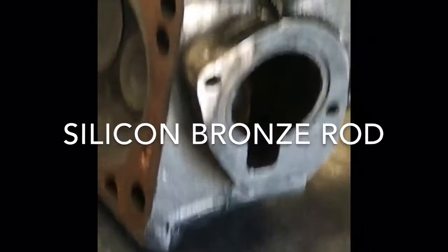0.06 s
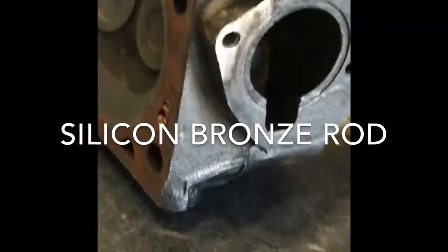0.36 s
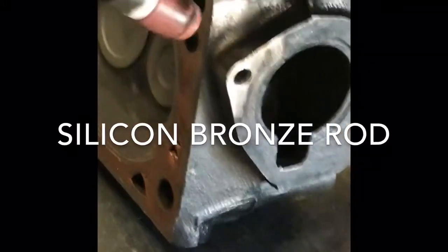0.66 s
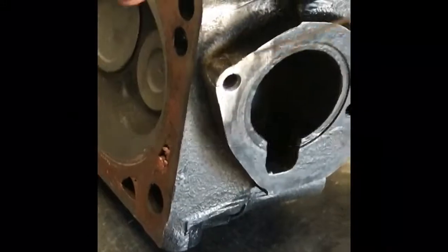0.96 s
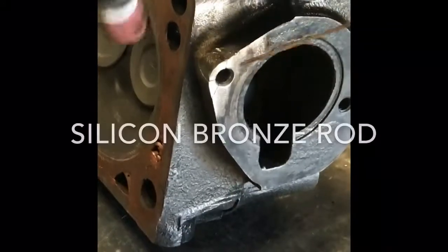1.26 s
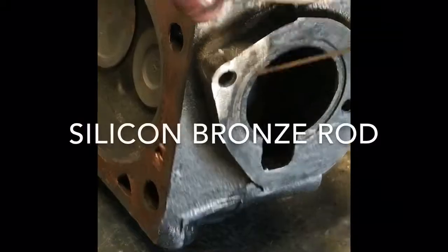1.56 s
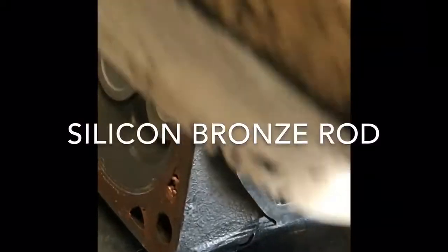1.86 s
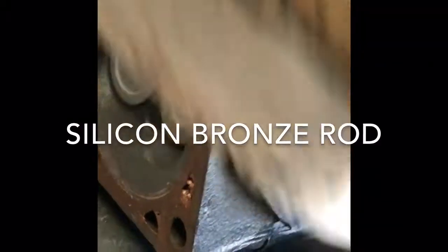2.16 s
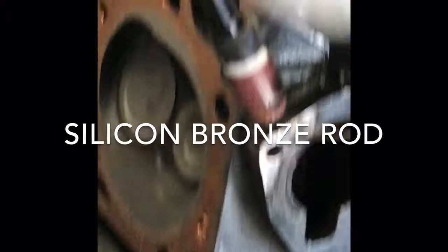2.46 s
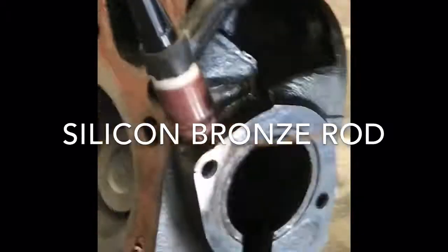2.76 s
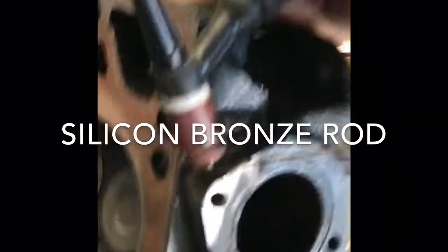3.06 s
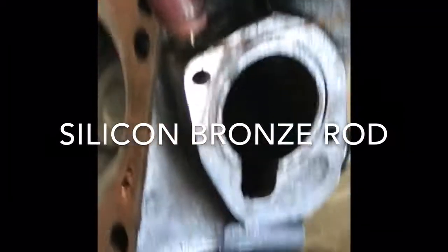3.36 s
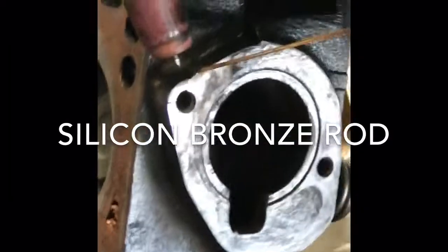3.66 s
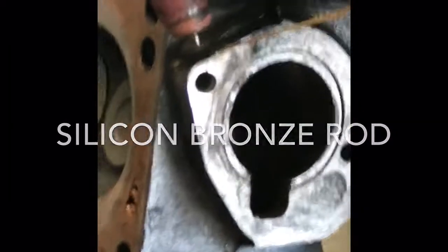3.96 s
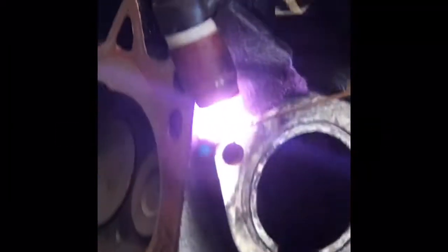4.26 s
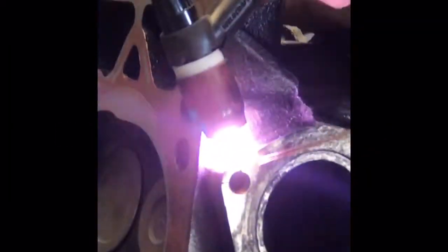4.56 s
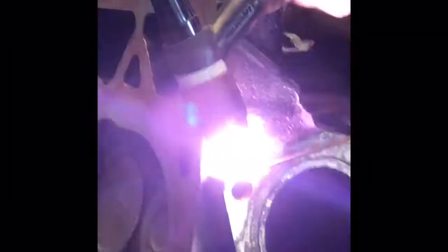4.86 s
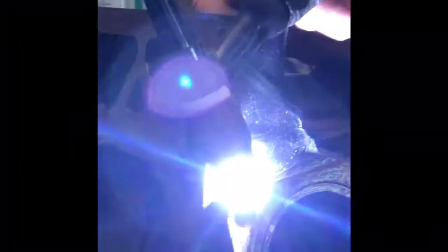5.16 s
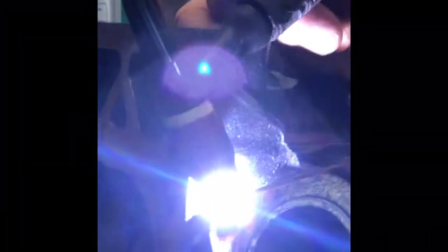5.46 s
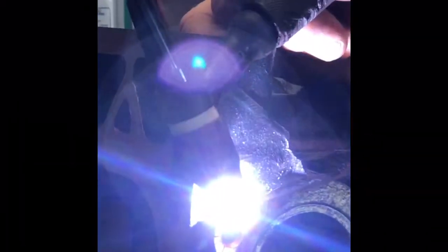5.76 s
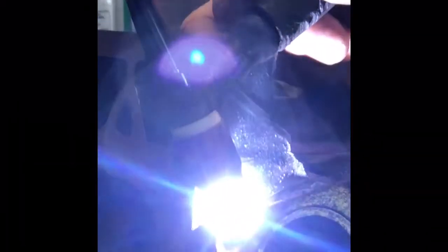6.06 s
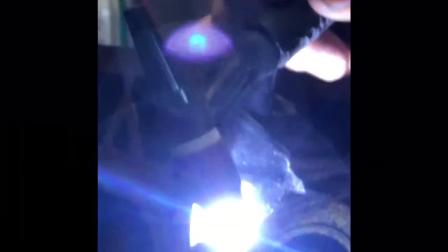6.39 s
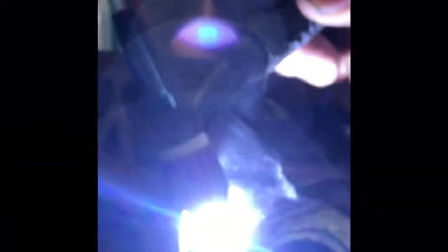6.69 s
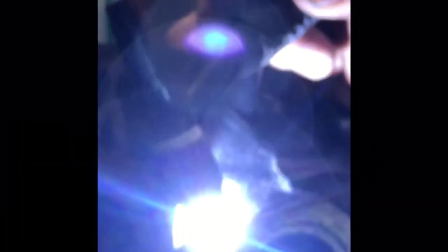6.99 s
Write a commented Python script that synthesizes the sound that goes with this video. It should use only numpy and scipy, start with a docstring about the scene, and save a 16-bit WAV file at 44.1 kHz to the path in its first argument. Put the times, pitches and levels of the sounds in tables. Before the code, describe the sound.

A welder's fan drones, a valve clicks and gas hisses, then an electric arc crackles loudly and settles into a steady buzz.

```python
"""Workshop: TIG welding on a cast engine part, close to a phone. The welder's fan drones; trigger and
gas valve click and argon surges from the cup. The AC arc first sputters, hissing at every half cycle
and popping as it relights, goes out, strikes again and settles to a fine buzz. Hollows in the casting
colour arc and gas. The phone's gain control ducks the workshop under the sputtering."""
import sys
import numpy as np
from scipy import signal
from scipy.fft import rfft, irfft, next_fast_len
from scipy.io import wavfile
from scipy.ndimage import uniform_filter1d, minimum_filter1d, map_coordinates

SR = 44100
rng = np.random.default_rng(int(sys.argv[2]) if len(sys.argv) > 2 else 0)


def digitize_waveform(pressure):
    """Quantize a signal to 16-bit integers and store it at the path in sys.argv[1].

    Rows of a 2-D input are taken as channels; values are limited to [-1, 1].
    """
    field = np.atleast_2d(pressure).T
    bounded = np.clip(field, -1, 1)
    quanta = np.round(bounded * 32767).astype(np.int16)
    wavfile.write(sys.argv[1], SR, quanta)


N = 314462
T = np.arange(N) / SR
FFT_SIZE = next_fast_len(N + 8192, True)
F = np.maximum(np.arange(FFT_SIZE // 2 + 1) * SR / FFT_SIZE, 1e-3)

HALF_CYCLE_HZ, REIGNITE_PHASE = 120.0, .6  # phase in half cycles
LIGHT_S, LIGHT_RISE_S, CALM_S = 4.148, .006, 4.7  # first arc
STRIKE_S, STEP_UP_S = 5.15, 5.335  # second arc

# Hollows of the casting. Each row: frequency in Hz, width in Hz, gain in dB.
CASTING_MODES = [(2570, 710, -9.5), (3965, 820, 3), (5310, 210, -9.5), (6030, 420, 1.5), (6980, 470, 1.5),
                 (8250, 290, -4), (9820, 490, -2), (12080, 1300, -1.5)]


def undb(db):
    """Decibels to gain."""
    return 10 ** (np.asarray(db) / 20)


def unit(x):
    """Scale to rms 1."""
    return x / np.sqrt(np.mean(x ** 2))


def noise():
    """White noise."""
    return rng.standard_normal(N)


def walk(rate_hz):
    """Random wander, spread near 1."""
    return np.interp(T * rate_hz, np.arange(1024), rng.standard_normal(1024))


def ramp(start_s, length_s):
    """Linear rise from 0 to 1, then held."""
    return np.clip((T - start_s) / length_s, 0, 1)


def fade(start_s, decay_s):
    """Jump to 1, then exponential decay."""
    envelope = np.zeros(N)
    first = int(start_s * SR)
    age_s = T[:min(int(10 * decay_s * SR), N - first)]
    envelope[first:first + len(age_s)] = np.exp(-age_s / decay_s)
    return envelope


def delayed(x, delay_ms):
    """Fixed or moving delay."""
    return map_coordinates(x, [(T - delay_ms / 1000) * SR], order=3)


def through(x, response):
    """Filter by a frequency response."""
    return irfft(rfft(x, FFT_SIZE) * response, FFT_SIZE)[:N]


def colour(points):
    """Minimum-phase response through (Hz, dB) points."""
    hz, db = np.transpose(points)
    outline_db = np.interp(np.log(F), np.log(hz), db)
    cepstrum = irfft(np.log(undb(outline_db)), FFT_SIZE)
    cepstrum[1:FFT_SIZE // 2] *= 2
    cepstrum[FFT_SIZE // 2 + 1:] = 0
    return np.exp(rfft(cepstrum))


def lowpass(hz):
    """One-pole low-pass response."""
    return 1 / (1 + 1j * F / hz)


def band(hz, width_hz):
    """One resonance, gain 1 at its centre."""
    return 1 / (1 + 1j * (F - hz * hz / F) / width_hz)


def modes(rows):
    """Sum of (Hz, width in Hz, dB) resonances."""
    return sum(undb(db) * band(hz, width_hz) for hz, width_hz, db in rows)


def fan(air_db=-38.5, rumble_hz=330, thin_s=5.23, thinning_s=.41, thin_db=-5.5):
    """Rushing air and wavering lines of fan and transformer; the rumble thins during the weld."""
    # Fan and room noise. Each row: frequency in Hz, relative density in dB.
    air_spectrum = [(25, -9), (45, -13.5), (60, -12.5), (92, -13), (129, -4), (161, -3), (240, -9),
                    (312, -9.5), (360, -13.5), (525, -12), (753, -21), (1020, -19), (1460, -24),
                    (2000, -28.5), (6000, -38), (16000, -55.5)]
    # Drone lines. Each row: frequency in Hz, mean level in dB.
    drone_lines = [(73.3, -53.5), (112, -53), (118, -48), (138.6, -42.5), (183, -50), (192, -55)]
    air = unit(through(noise(), colour(air_spectrum))) * undb(air_db + .5 * walk(4.61))
    rumble = through(air, 1 / (1 + (F / rumble_hz) ** 4))
    drone = 0
    for hz, db in drone_lines:
        phase = 2 * np.pi * np.cumsum(hz + 1.71 * walk(9)) / SR
        drone += np.sqrt(2) * undb(db + 3.7 * walk(5.3)) * np.sin(phase)
    rumble_gain = undb(thin_db * ramp(thin_s, thinning_s))
    return air + (rumble_gain - 1) * rumble + drone


def tool_clicks():
    """Trigger, hood and rod click: short bursts of band noise."""
    # Clicks. Each row: start in seconds, level in dB, centre in Hz, width in Hz, decay in seconds.
    clicks = [(.089, -45, 10000, 12000, .005), (.099, -34.5, 1830, 2500, 0.0099),
              (.14, -44, 11000, 9000, .008), (0.251, -27.5, 1490, 2200, 0.012),
              (2.489, -31.5, 6000, 12100, 0.0028), (2.499, -34.5, 1300, 1500, 0.0062),
              (2.608, -34.5, 12800, 9000, .0079), (2.644, -43, 6550, 9000, 0.039),
              (2.736, -40.5, 2630, 397, .017), (3.14, -48, 9000, 7000, .02),
              (3.323, -33.5, 1640, 900, .004)]
    return sum(undb(db) * fade(start_s, decay_s) * unit(through(noise(), band(hz, width_hz) ** 2))
               for start_s, db, hz, width_hz, decay_s in clicks)


def gas_valve():
    """The valve clacks and bounces; each blow rings its modes."""
    # Blows. Each row: time in seconds, impulse height in dB.
    clacks = [(0.2702, 14.5), (0.2717, 16.5), (.278, 16)]
    # Valve resonances. Each row: frequency in Hz, width in Hz, gain in dB.
    valve_modes = [(325, 37, 13), (890, 210, -4), (1330, 130, -5), (2300, 150, -8), (3370, 530, -30)]
    blows = np.zeros(N)
    for time_s, db in clacks:
        blows[int(time_s * SR)] += undb(db)
    return through(blows, modes(valve_modes))


def gas_flow_db(open_s=.139, rise_s=.1, hold_s=.31, surge_db=-30, drain_db_per_s=26.5,
                steady_db=-56, on_work_db=7.3, soften_db_per_s=3):
    """Stored pressure drains to a steady flow, louder as the cup nears the work, softer in the weld."""
    surge = undb(surge_db - drain_db_per_s * np.maximum(T - open_s - hold_s, 0))
    lowered = ramp(start_s=2.1, length_s=1.5)
    steady = undb(steady_db + on_work_db * lowered - soften_db_per_s * np.maximum(T - STEP_UP_S, 0))
    return 20 * np.log10(np.hypot(surge, steady) * ramp(open_s, rise_s) + 1e-9)


def breathy(hz, width_hz):
    """A whistle kept wide and unsteady by turbulence."""
    swirl = unit(through(noise(), lowpass(width_hz) ** 2))
    phase = 2 * np.pi * np.cumsum(hz + .5 * width_hz * walk(140)) / SR
    return unit(swirl * np.sin(phase))


def gas_jet(tilt_per_db=.036, whistle_full_db=-51):
    """Argon hisses from the cup, brighter when faster; at the joint the casting colours it."""
    # Jet noise. Each row: frequency in Hz, relative density in dB.
    jet_spectrum = [(1000, -26), (2200, -11), (3200, -3.5), (4200, 1), (5400, -3.5), (6500, -7),
                    (8000, -8.5), (9000, -5.5), (12500, 0.5), (16000, -6)]
    # The cup's note as the torch moves. Each row: time in seconds, frequency in Hz.
    cup_note = [(0.2, 4250), (0.49, 4260), (0.52, 3950), (0.92, 4210), (1.17, 3860), (1.3, 4350),
                (1.47, 3900), (1.91, 4283), (2.92, 4230), (2.97, 3870), (3.4, 3930)]
    # Cup tones. Each row: multiple of the note, width in Hz, relative level in dB.
    cup_tones = [(1.005, 180.2, -3.5), (1.27, 180.5, -11), (2.09, 260, -12), (2.3, 280, -12)]
    flow_db = gas_flow_db()
    note_hz = np.interp(T, *np.transpose(cup_note))
    bright = unit(through(noise(), colour(jet_spectrum)))
    mellow = through(bright, lowpass(9000))
    jet = mellow + tilt_per_db * np.maximum(flow_db + 60, 0) * (bright - mellow)
    period_ms = 1000 / note_hz  # two echoes move with the note
    jet = jet + undb(-14) * delayed(jet, 2.04 * period_ms) + undb(-9) * delayed(jet, 3.01 * period_ms)
    tones = sum(undb(db) * breathy(multiple * note_hz, width_hz) for multiple, width_hz, db in cup_tones)
    in_air = undb(.5) * (jet + tones)
    on_work = unit(through(mellow, band(2600, 14500) * modes(CASTING_MODES)))
    landed = ramp(start_s=2.67, length_s=.7)
    rush = np.sqrt(1 - landed) * in_air + np.sqrt(landed) * on_work
    nozzle_whistles = undb(-8.5) * breathy(3456, 90) + undb(-12.5) * breathy(5320, 120)
    return undb(flow_db) * rush + undb(np.minimum(flow_db, whistle_full_db)) * nozzle_whistles


def pop_events(small_db=-21, scatter_db=5.5, small_ms=.96):
    """Loud pops of the arc lighting, plus a small random one at each reversal until it calms."""
    # Pops. Each row: start in seconds, relative level in dB, decay in ms.
    loud_pops = [(4.11, 3.5, 3), (4.1638, 4, 3.3), (4.1968, 2.5, 4.9), (4.2139, 7.5, 2.8), (4.2628, 5, 2.3),
                 (4.3134, 4, 3.5), (4.347, -2.5, 1.1), (4.3799, -10.5, 2.2), (4.4304, 0, 1),
                 (4.4799, -5, 1), (4.5465, 4.5, 0.97), (4.5628, 0, 3.1), (4.5881, -3, 1.8), (4.6383, -1, 2),
                 (4.6883, 4, 3.1), (4.7299, 0, 2.2), (5.1433, 5, 7.7)]
    reversals_s = (np.arange(1024) + REIGNITE_PHASE) / HALF_CYCLE_HZ
    sizes_db = small_db + scatter_db * np.clip(rng.standard_normal(len(reversals_s)), -2, 2)
    return loud_pops + [(start_s, db, small_ms) for start_s, db in zip(reversals_s, sizes_db)
                        if LIGHT_S + LIGHT_RISE_S < start_s < CALM_S]


def cracks(pops, gain_db=3, full_db=-5, lead_s=.0008, decay_s=.0012):
    """The gap cracks just ahead of each puff, growing with it up to a full breakdown."""
    envelope = sum(undb(min(db - full_db, 0)) * fade(start_s - lead_s, decay_s)
                   for start_s, db, _ in pops)
    return undb(gain_db) * noise() * envelope


def puffs(pops, gain_db=10, edge_hz=4000, roughness=.051):
    """Each relighting shoves out suddenly heated gas; eddies give every puff its own colour."""
    pressure = sum(undb(db) * fade(start_s, decay_ms / 1000) for start_s, db, decay_ms in pops)
    eddies = unit(through(noise(), band(1100, 2200) ** 2))
    return undb(gain_db) * through(pressure * (1 + roughness * eddies), lowpass(edge_hz))


def half_cycles(depth_db, scatter_db, fall_fraction=.23):
    """Envelope that swells unequally in each half cycle and collapses as the current reverses."""
    position = T * HALF_CYCLE_HZ - REIGNITE_PHASE - .03
    phase = position % 1
    dip = np.minimum(phase / fall_fraction, (1 - phase) / (1 - fall_fraction))
    scatter = rng.standard_normal(1024)[(position + 2 - fall_fraction).astype(int)]
    return unit(undb(-depth_db * dip ** 1.13 + scatter_db * scatter))


def sizzles(gain_db=3):
    """Short spells of hiss at the strikes and during the weld, chopped by the current."""
    # Each row: peak time in seconds, half length in seconds, relative dB, centre in Hz, width in Hz.
    spells = [(4.136, 0.029, -32, 7000, 9000), (5.151, 0.0049, -8, 8000, 9000),
              (5.222, 0.039, -28, 8400, 9000), (6.31, 0.052, -49, 9000, 7000),
              (6.365, 0.031, -39, 13500, 3500), (6.595, 0.088, -48, 8850, 9000)]
    hiss = noise() * half_cycles(depth_db=11, scatter_db=4)
    sizzle = 0
    for peak_s, half_s, db, hz, width_hz in spells:
        swell = np.exp(-((T - peak_s) / half_s) ** 2)
        sizzle += undb(db + gain_db) * swell * unit(through(hiss, band(hz, width_hz)))
    return sizzle


def sputter(wild_db=-3.5, calm_db=-14.5, wild_chop_db=49.5, calm_chop_db=16,
            out_s=5.068, stretch_s=.071, out_db_per_s=1400):
    """The first arc hisses once per half cycle; bursts shrink, then merge as it stretches and dies."""
    # Arc hiss. Each row: frequency in Hz, relative density in dB.
    hiss_spectrum = [(200, -12), (800, 2.5), (1800, -1.5), (3000, 6), (4200, -1.5), (5000, -6), (6500, 0.5),
                     (9200, 1.5), (13000, 0), (15800, -1)]
    grainy = noise() * undb(.5 * noise())
    hiss = unit(through(grainy, colour(hiss_spectrum)))
    calm = ramp(CALM_S, .14)
    stretched = ramp(out_s - stretch_s, stretch_s)
    chop_db = (wild_chop_db + (calm_chop_db - wild_chop_db) * calm) * (1 - stretched)
    level_db = wild_db + (calm_db - wild_db) * calm - out_db_per_s * np.maximum(T - out_s, 0)
    return hiss * half_cycles(chop_db, scatter_db=2) * ramp(LIGHT_S, LIGHT_RISE_S) * undb(level_db)


def buzz_gain(start_db=-31, weld_db=-37, rise_s=.063, lift_db=13.5, ease_s=.13, sag_db_per_s=2.04):
    """The buzz starts low, steps up, then eases as the phone's gain returns and slowly sags."""
    age_s = np.maximum(T - STEP_UP_S, 0)
    welding_db = weld_db + lift_db * np.exp(-age_s / ease_s) - sag_db_per_s * age_s
    return (T > STRIKE_S) * undb(start_db + (welding_db - start_db) * ramp(STEP_UP_S, rise_s))


def buzz(scatter_db=1.3, alternate_db=-.9, jitter_s=12e-6, fizz_db=-7, bench_gain=.4, bench_ms=3.85):
    """The settled arc ticks at each reversal, trailing fizz; a bench echo combs the harmonics."""
    # Tick colour. Each row: frequency in Hz, relative gain in dB.
    tick_spectrum = [(120, -39), (400, 0), (800, 8), (1400, 4), (2000, 0), (2800, -2), (4200, -10),
                     (5000, -18), (7000, -11.5), (9200, -14), (13000, -20.5), (16000, -18)]
    reversals = np.arange(int(T[-1] * HALF_CYCLE_HZ))
    sizes = undb(scatter_db * rng.standard_normal(len(reversals)) + alternate_db * (-1) ** reversals)
    position = T * HALF_CYCLE_HZ - REIGNITE_PHASE
    nearest = np.round(position)
    late_s = np.interp(nearest, reversals, jitter_s * rng.standard_normal(len(reversals)))
    offset_samples = ((position - nearest) / HALF_CYCLE_HZ - late_s) * SR
    impulses = np.sinc(offset_samples) * np.exp(-(offset_samples / 6) ** 2)
    ticks = impulses * np.interp(nearest, reversals, sizes)
    fizz = through(noise() * np.exp(-(position % 1) / .95), band(6200, 7900))
    arc = unit(through(unit(ticks) + undb(fizz_db) * unit(fizz), colour(tick_spectrum)))
    return (arc + bench_gain * delayed(arc, bench_ms)) * buzz_gain()


def casting(x):
    """Sound from the joint passes through the part's hollows; only low tones come around them."""
    around = undb(-7) * lowpass(3500)
    return through(x, around + modes(CASTING_MODES))


def workshop(x, wet_db=-13, predelay_s=.0058, decay_s=.029):
    """Bench and walls return a short, slightly dull scatter."""
    tail = noise() * fade(predelay_s, decay_s)
    tail /= np.sqrt(np.sum(tail ** 2))
    return x + undb(wet_db) * through(x, rfft(tail, FFT_SIZE) * band(3300, 26000))


def scene():
    """The arc rings the casting; fan and gas run on beneath it."""
    pops = pop_events()
    arc = casting(sputter() + sizzles() + cracks(pops) + buzz())
    return (workshop(arc + tool_clicks() + gas_valve()) + puffs(pops) + gas_jet() + fan())[None]


def microphone(x, cut_hz=55, damping=.86, allpass_hz=(88, 480, 2200)):
    """The phone cuts deep bass and delays lows more than highs: a puff becomes a falling thump."""
    s = 1j * F / cut_hz
    response = s * s / (1 + damping * s + s * s)
    for hz in allpass_hz:
        poles = 1 + np.sqrt(2) * 1j * F / hz - (F / hz) ** 2
        response *= np.conj(poles) / poles
    return through(x, response)


def gain_control(x, threshold_db=-12, max_cut_db=11, release_db_per_s=53):
    """Peaks pull the gain down at once, by a limited amount; it creeps back."""
    recovery_db = release_db_per_s * T
    level_db = 20 * np.log10(np.abs(x) + 1e-9)
    peak_db = np.maximum.accumulate(level_db + recovery_db) - recovery_db
    gain_db = -np.clip(peak_db - threshold_db, 0, max_cut_db)
    held_db = minimum_filter1d(gain_db, size=200)
    return x * undb(uniform_filter1d(held_db, size=200))


def record(dry):
    """Microphone, gain control, clipping and a steep top cut."""
    clipped = np.clip(gain_control(microphone(dry[0])), -1, 1)
    top_cut = signal.ellip(10, .2, 80, 15900, fs=SR, output="sos")
    return signal.sosfilt(top_cut, clipped)[None]


dry = scene()
out = record(dry)
digitize_waveform(out)
```